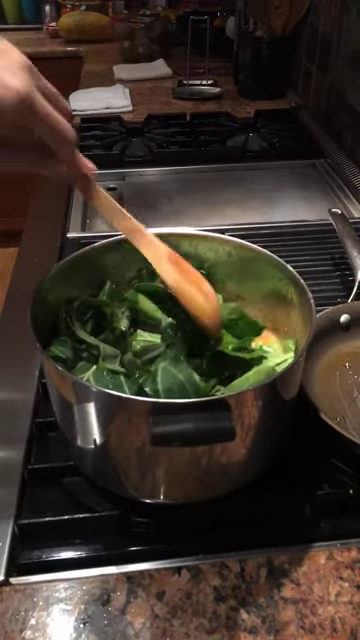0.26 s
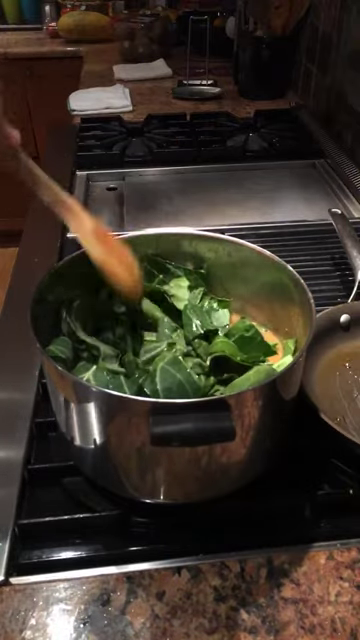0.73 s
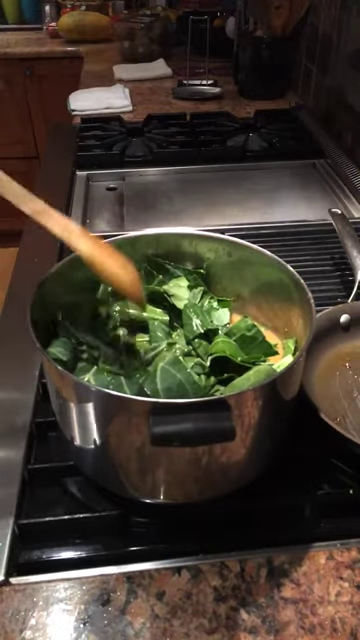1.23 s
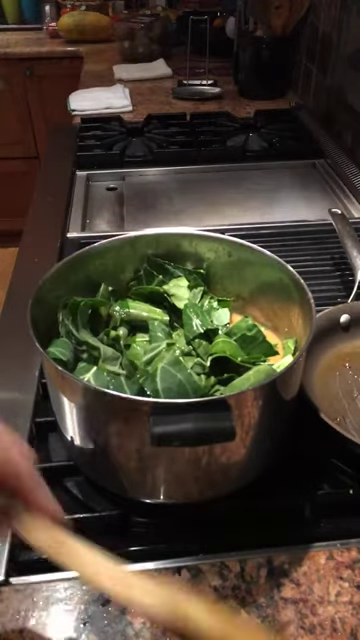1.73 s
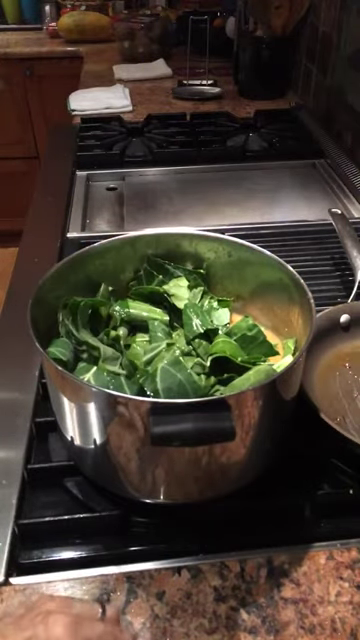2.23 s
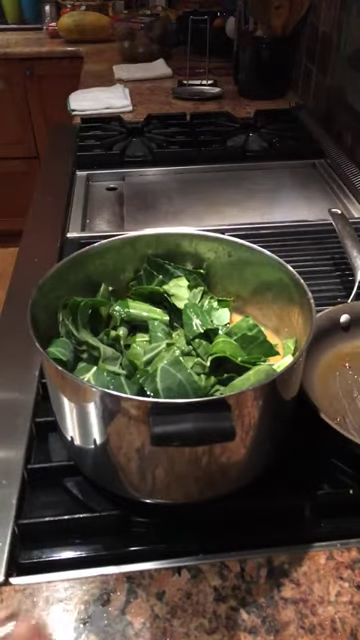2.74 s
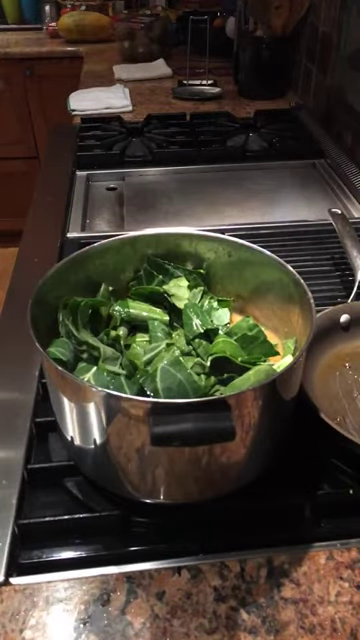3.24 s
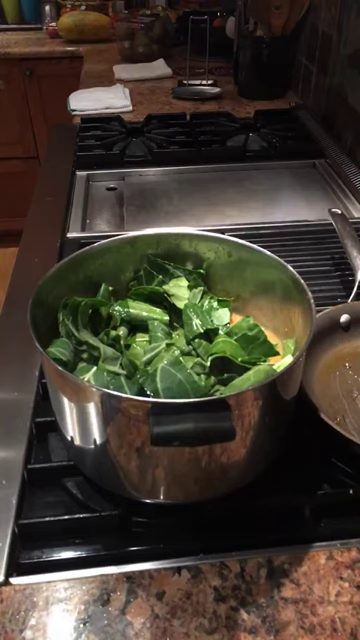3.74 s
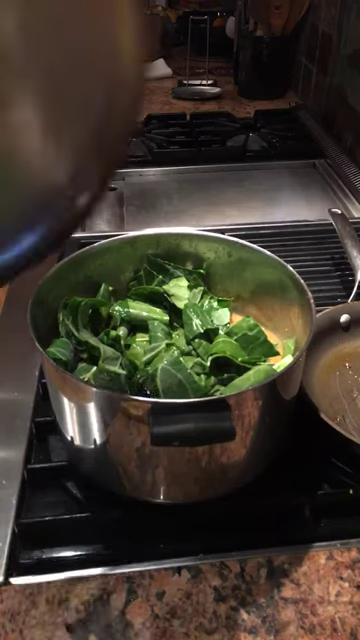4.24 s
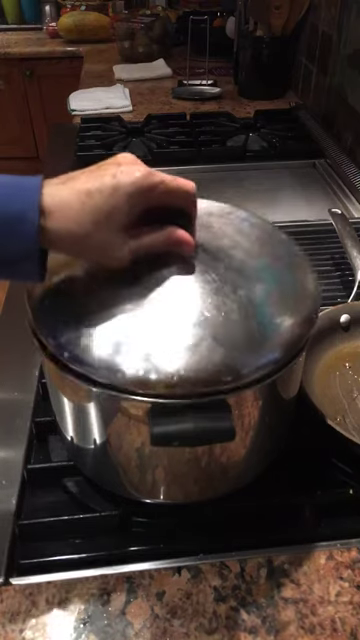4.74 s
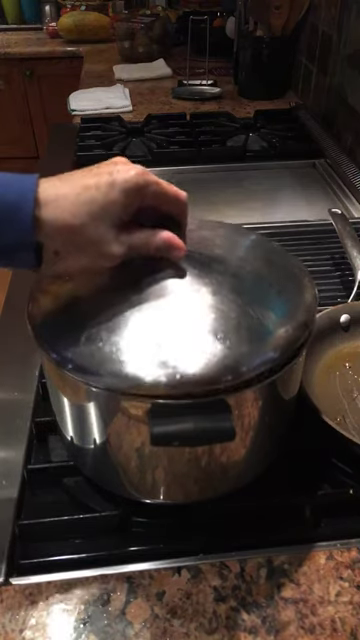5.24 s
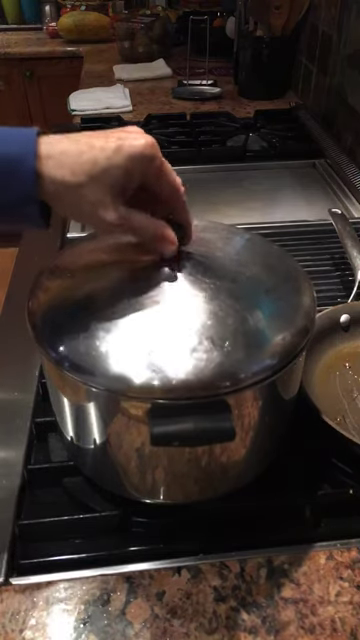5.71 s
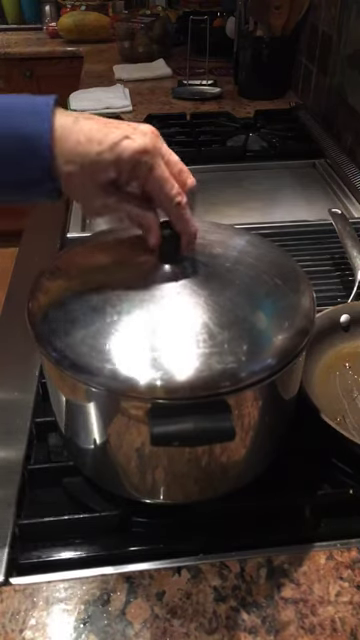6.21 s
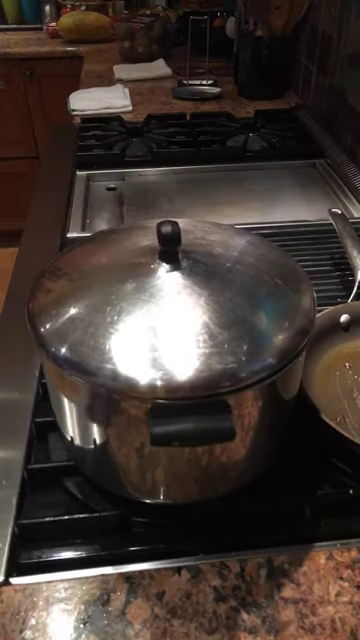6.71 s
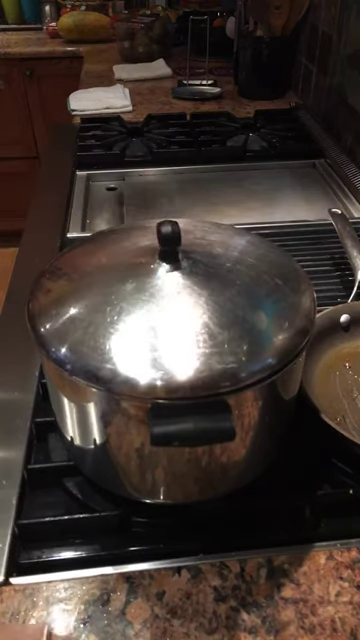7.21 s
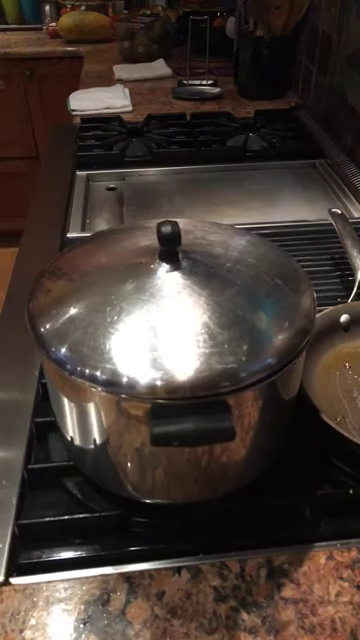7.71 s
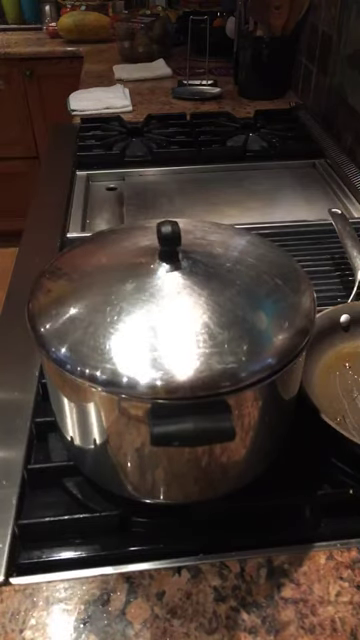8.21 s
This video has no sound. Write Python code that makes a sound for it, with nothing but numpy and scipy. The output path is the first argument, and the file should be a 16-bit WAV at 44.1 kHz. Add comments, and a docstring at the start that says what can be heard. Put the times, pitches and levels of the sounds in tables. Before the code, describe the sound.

Leafy greens crackle softly as a wooden spoon bumps a steel pot with two muffled knocks. The spoon then lands on a nearby spoon rest, which chatters sharply on the stone counter, the loudest sound. A little farther off, a metal lid clanks several times onto the pot and scrapes briefly along the rim. A low fan hum fills the small kitchen throughout, with faint swishes and clinks.

```python
"""A fan hums in a small kitchen. A wooden spoon pushes rustling greens down in a steel pot, knocking
its wall, then is dropped on a hard spoon rest, which chatters on the counter. A steel lid is picked up,
clatters onto the pot and is slid into place with a rasp. Faint swishes, clinks and one thin squeak
fall in between. Blows are decaying modes plus a noise burst; the microphone's limiter ducks under
the loudest clatter."""
import sys
import numpy as np
from scipy import signal
from scipy.fft import rfft, irfft, next_fast_len
from scipy.io import wavfile
from scipy.ndimage import uniform_filter1d, minimum_filter1d

SR = 44100
rng = np.random.default_rng(int(sys.argv[2]) if len(sys.argv) > 2 else 0)


def store_wav(level_fs):
    """Save 16-bit WAV to argv[1]."""
    pcm = np.round(np.clip(np.atleast_2d(level_fs), -1, 1) * 32767)
    wavfile.write(sys.argv[1], SR, pcm.T.astype(np.int16))


N = 373084
T = np.arange(N) / SR
RING_T = T[:SR // 2]


def undb(db):
    """Decibels to gain."""
    return 10 ** (np.asarray(db) / 20)


def unit(x):
    """Scale to rms 1."""
    return x / np.sqrt(np.mean(x ** 2))


def attack_unit(x):
    """Scale a blow to rms 1 over its first 10 ms."""
    return x / np.sqrt(np.mean(x[:SR // 100] ** 2))


def colour(x, points):
    """Filter x through a curve of (Hz, dB) points, rolled off below the first; rms 1."""
    hz, db = np.transpose(points)
    size = next_fast_len(len(x))
    bin_hz = np.arange(size // 2 + 1) * SR / size + 1
    gain = undb(np.interp(np.log(bin_hz), np.log(hz), db))
    low_cut = np.minimum(bin_hz / hz[0], 1) ** 2
    return unit(irfft(rfft(x, size) * gain * low_cut, size)[:len(x)])


def walk(rate_hz):
    """Smooth random wander; rms 1."""
    knots = rng.standard_normal(int(N / SR * rate_hz) + 2)
    return unit(np.interp(T * rate_hz, np.arange(len(knots)), knots))


def soften(x, cutoff_hz):
    """Low-pass: a longer contact feeds less treble into the body."""
    return signal.lfilter(*signal.butter(2, min(cutoff_hz, .45 * SR), fs=SR), x)


def add(out, start_s, x):
    """Mix x into out at start_s."""
    i = int(start_s * SR)
    out[i:i + len(x)] += x[:N - i]


def fade(t60_s):
    """Exponential decay, 60 dB in t60_s."""
    return np.exp(-np.log(1000) * RING_T / t60_s)


def swell(length_s, rise_share):
    """Rounded rise and fall, peaking at rise_share of its length."""
    progress = np.linspace(0, 1, int(length_s * SR))
    return np.sin(np.pi / 2 * np.interp(progress, [0, rise_share, 1], [0, 1, 0]))


def ring(modes, scatter_db):
    """Modes of a struck body; each contact point weights them differently."""
    draws = rng.standard_normal((len(modes), 2))
    out = np.zeros(len(RING_T))
    for (hz, db, t60_s), (weight, side) in zip(modes, draws):
        gain = np.sign(side) * undb(db + scatter_db * weight)
        out += gain * fade(t60_s) * np.sin(2 * np.pi * hz * RING_T)
    return attack_unit(out)


def crack(points, t60_s):
    """Crowded resonances dying together as a noise burst."""
    rise = np.minimum(RING_T / .00054, 1)
    return attack_unit(colour(rng.standard_normal(len(RING_T)), points) * rise * fade(t60_s))


def thud(hz, cycles):
    """A heavy body rocks: a few low cycles with a rounded start."""
    rise = 1 - np.exp(-2 * hz * RING_T)
    return attack_unit(np.sin(2 * np.pi * hz * RING_T) * fade(cycles / hz) * rise)


# Fan and mains tones. Each row: frequency in Hz, rms level in dB, signed waver in dB.
HUM_TONES = [(59.7, -47, 0.5), (69.2, -51.5, 3.5), (150.9, -42, -1.6), (297.7, -59, 2.5)]
# Rumble and room air spectra. Each row: frequency in Hz, relative level in dB.
RUMBLE_SPECTRUM = [(15, -2), (33, 11), (45, 6), (64, 7.5), (85, 5.5), (150, 3.5), (180, -8), (280, -2.5),
                   (330, -1), (400, -19.5), (520, -38.5)]
AIR_SPECTRUM = [(400, -1), (540, -3.5), (760, -6), (1460, -13), (2500, -17.5), (3500, -18.5), (5100, -26),
                (6200, -22.5), (8000, -26.5), (10400, -33), (13000, -32.5), (15800, -40)]


def fan():
    """Fan and mains tones waver in level and phase over low rumble and room air."""
    hum = np.zeros(N)
    for hz, db, waver_db in HUM_TONES:
        amplitude = np.sqrt(2) * undb(db + waver_db * walk(7))
        drift_rad = .25 * waver_db * walk(4.9)
        hum += amplitude * np.sin(2 * np.pi * hz * T + drift_rad)
    rumble = undb(-45.5) * colour(rng.standard_normal(N), RUMBLE_SPECTRUM)
    air = undb(-54 + .5 * walk(1.7)) * colour(rng.standard_normal(N), AIR_SPECTRUM)
    return hum + rumble + air


# Spoon strokes through the greens. Each row: start in seconds, length in seconds, level in dB.
LEAF_STROKES = [(0.322, 0.18, -52.5), (0.842, 0.065, -48.5), (.905, 0.069, -57.5), (1.128, 0.044, -52.5)]


def leaves():
    """Wet leaves crackle as the spoon pushes through."""
    envelope = sum(undb(db) * np.sin(np.pi * np.clip((T - start_s) / length_s, 0, 1))
                   for start_s, length_s, db in LEAF_STROKES)
    grains = rng.standard_normal(N) * undb(3.5 * np.minimum(rng.exponential(size=N), 6))
    return envelope * colour(grains, [(400, 2), (1500, 2), (4000, -1), (8000, -9), (15000, -7.5)])


# Swishes. Each row: start in seconds, length in seconds, level in dB, tilt in dB per octave.
SWISHES = [(0.477, 0.53, -57, -1), (1.515, 0.73, -56, -1), (3.406, 0.74, -55, 1), (4.021, 0.36, -56.5, 0.5),
           (4.5, 0.64, -57.5, 2), (6.727, 0.51, -52, -1), (7.544, .4, -56.5, -1.5), (8.165, .3, -56, 3)]
# Their hiss before tilt. Each row: frequency in Hz, relative level in dB.
HISS_SPECTRUM = [(500, 0), (1200, 2), (3500, -2), (5100, -7), (6500, -9), (10000, -11.5), (13000, -9),
                 (15500, -11)]


def swishes():
    """Faint airy hiss that comes quickly and ebbs slowly."""
    out = np.zeros(N)
    noise = rng.standard_normal(N) * undb(2.1 * walk(30))
    for start_s, length_s, db, tilt_db_per_octave in SWISHES:
        i = int(start_s * SR)
        envelope = swell(length_s, rise_share=.29)[:N - i]
        tilted = [(hz, band_db + tilt_db_per_octave * np.log2(hz)) for hz, band_db in HISS_SPECTRUM]
        hiss = colour(noise[i:i + len(envelope)], tilted)
        add(out, start_s, undb(db) * envelope * hiss)
    return out


# Spoon on the pot. Each row: start in seconds, level in dB, contact cutoff in Hz, thud level in dB.
POT_KNOCKS = [(.785, -27, 1050, -29.5), (.941, -45.5, 900, -59), (1.1715, -31, 1580, -36)]
# Filled pot's modes. Each row: frequency in Hz, relative level in dB, t60 in seconds.
POT_MODES = [(259, -7, 0.05), (404, -0.5, 0.044), (608, 0, 0.038), (908, -6.5, 0.036), (1220, -18, 0.046),
             (1580, -17, 0.047), (2800, -11, 0.028)]
# Its crowded resonances. Each row: frequency in Hz, relative level in dB.
POT_SPECTRUM = [(120, -15), (280, -4), (450, 0), (800, 2), (1500, -6.5), (3000, -14), (6000, -9),
                (15000, 1)]


def pot():
    """Wood on steel, muffled by greens: a graze, the blow, then the pot rocks back."""
    def knock(contact_hz):
        body = undb(-8.5) * ring(POT_MODES, scatter_db=-7) + crack(POT_SPECTRUM, t60_s=.055)
        return attack_unit(soften(body, contact_hz))

    out = np.zeros(N)
    for start_s, db, contact_hz, thud_db in POT_KNOCKS:
        graze = undb(db - 5) * knock(contact_hz=3250)
        blow = undb(db) * knock(contact_hz) + undb(thud_db) * thud(hz=298, cycles=12)
        rock = undb(db - 15.5) * knock(contact_hz) + undb(db - 7) * thud(hz=83, cycles=11)
        add(out, start_s - .003, graze)
        add(out, start_s, blow)
        add(out, start_s + .026, rock)
    return out


def squeak():
    """A thin, unsteady tone sinks as the spoon is lifted away."""
    start_s, start_hz, sag_hz_per_s = 1.56, 4600, 2000
    out = np.zeros(N)
    envelope = swell(length_s=.28, rise_share=.7)
    hz = (start_hz - sag_hz_per_s * T + 170 * walk(900))[:len(envelope)]
    tone = unit(np.sin(2 * np.pi * np.cumsum(hz) / SR))
    add(out, start_s, undb(-61.5) * envelope * tone)
    return out


# Spoon rest's modes. Each row: frequency in Hz, relative level in dB, t60 in seconds.
REST_MODES = [(706, -15, .06), (1250, -1, .07), (1298, -1, .07), (1355, -2, .07), (1518, -1, .05),
              (1578, -2, .05), (1684, -5, .05), (2487, 3, .1), (2525, -2, .11), (2745, -4, .06),
              (3050, -4, .06), (3368, -7, .09), (4005, 0, .07), (4530, -2, .06), (4620, -2, .05),
              (6050, -11, .06), (6870, -14, .07)]
# Its crowded resonances. Each row: frequency in Hz, relative level in dB.
REST_SPECTRUM = [(180, -28.5), (480, -15.5), (700, -4), (1000, -10.5), (1400, -3), (1700, -4.5),
                 (2200, -5.5), (2700, -1), (3400, -5.5), (4500, 4), (5150, -21.5), (6100, -4.5),
                 (7600, -18.5), (9500, -7.5), (15000, -21)]


def clack(db, contact_hz):
    """One blow on the spoon rest: hard blows ring, light ones only clack."""
    ringing = undb(3.5 + .27 * db) * ring(REST_MODES, scatter_db=1)
    body = ringing + crack(REST_SPECTRUM, t60_s=.067)
    return undb(db) * attack_unit(soften(body, contact_hz))


# The rest's high modes. Each row: frequency in Hz, relative level in dB, t60 in seconds.
CHATTER_MODES = [(6863, -13, .07), (6930, -14, .07), (7986, -15, .07), (8587, -14, .09), (9866, -14, .09),
                 (11072, -8, .06), (11200, -3, .08), (11883, 0, .08), (11960, -2, .08), (12012, -8, .06),
                 (13225, -8, .06), (13312, -1, .08), (13420, -6, .06), (13470, -5, .06), (13542, 1, .08),
                 (13658, -8, .06), (14497, -11, .07), (15646, -2, .08)]
# Its crowded high resonances. Each row: frequency in Hz, relative level in dB.
CHATTER_SPECTRUM = [(1000, -16), (4400, -24.5), (5100, -23), (6900, -14), (7600, -17), (9400, -11),
                    (10400, -22), (11100, -10), (12400, -8.5), (13400, -3), (14200, -7.5), (15600, -7)]


def chatter(db):
    """One bounce of the rest on the stone counter rings very high."""
    ringing = undb(4 + .4 * db) * ring(CHATTER_MODES, scatter_db=1)
    return undb(db) * attack_unit(ringing + crack(CHATTER_SPECTRUM, t60_s=.055))


# Spoon on its rest. Each row: start in seconds, level in dB, contact cutoff in Hz.
SPOON_HITS = [(2.0911, -7, 1830), (2.094, -5, 5400), (2.11, -10.5, 6460), (2.146, -11, 2200),
              (2.4152, -21, 8750), (2.4207, -28, 800), (2.51, -37.5, 1170)]
# Rattles of the rest. Each row: start in seconds, length in seconds, clack in dB, chatter in dB.
REST_RATTLES = [(2.104, 0.042, -24, -18.5), (2.1469, .074, -18.5, 2), (2.4236, 0.014, -30.5, -20)]


def spoon_drop():
    """The spoon strikes its rest, which rattles on the counter in quickening, fading bounces."""
    out = np.zeros(N)
    for start_s, db, contact_hz in SPOON_HITS:
        add(out, start_s, clack(db, contact_hz))
    gaps_s = .0125 * .9 ** np.arange(12)
    bounces_s = np.cumsum(gaps_s) - gaps_s
    for start_s, length_s, clack_db, chatter_db in REST_RATTLES:
        for after_s in bounces_s[bounces_s < length_s]:
            spent = after_s / length_s
            bounce = clack(clack_db - 8.5 * spent, contact_hz=8000) + chatter(chatter_db - 13.5 * spent)
            add(out, start_s + after_s, bounce)
    # The spoon and its rest carry almost no bass.
    return signal.lfilter(*signal.butter(2, 300, "high", fs=SR), out)


# Lid contacts. Each row: start in seconds, level in dB, contact cutoff in Hz, relative ring in dB,
# thud in Hz, thud level in dB, second touch's delay in seconds, its level against the first in dB.
LID_HITS = [(2.7002, -37.5, 5100, -18, 315, -30.5, .0066, -0.5),
            (4.718, -29.5, 10500, -1, 293, -40.5, .0035, -7),
            (4.819, -35.5, 3580, -2.5, 295, -34.5, 0.0046, 5.5),
            (4.951, -36, 5460, -6, 267, -27.5, 0.0024, 8.5),
            (4.976, -33.5, 4200, -16, 229, -26.5, .0147, 3.5),
            (5.082, -27, 11900, -11, 156, -23.5, .004, -15),
            (5.2437, -39, 3020, -17.5, 277, -25, 0.014, -0.5),
            (5.736, -45.5, 12200, -9, 185, -38, 0.0072, -12.5)]
# Steel lid's modes. Each row: frequency in Hz, relative level in dB, t60 in seconds.
LID_MODES = [(452, -7, .15), (790, -12, .15), (858, -5, .22), (905, -9, .15), (1277, -8, .2),
             (1330, -7, .2), (1797, -6, .22), (1828, -2, .7), (1906, 0, .45), (1991, -4, .3),
             (2130, -8, .25), (2378, -12, .25), (2778, -13, .25), (3150, -9, .22), (3340, -11, .25),
             (4124, -9, .18), (4280, -9, .16), (4547, -14, .28), (6288, -18, .2), (8850, -19, .15)]
# Its crowded resonances. Each row: frequency in Hz, relative level in dB.
LID_SPECTRUM = [(150, 5), (400, 0), (900, -2.5), (1550, -8.5), (1950, -2.5), (2800, -11.5), (3250, -10),
                (3600, -13), (4250, -4.5), (5100, -14.5), (6500, -10.5), (7600, -14.5), (10000, -7.5),
                (15000, -4.5)]
# Stove top booming as the lid settles. Each row: start in seconds, level in dB.
STOVE_BOOMS = [(4.9907, -31), (5.085, -34)]


def lid_clatter():
    """The held lid touches twice per hit and rings briefly; its weight thumps pot and stove."""
    out = np.zeros(N)
    shell = crack(LID_SPECTRUM, t60_s=.14)  # the same thin steel answers every touch
    for start_s, db, contact_hz, ring_db, thud_hz, thud_db, second_s, second_db in LID_HITS:
        for after_s, touch_db in (0, 0), (second_s, second_db):
            hand_damped = ring(LID_MODES, scatter_db=1.5) * fade(t60_s=.6)
            click = crack(LID_SPECTRUM, t60_s=.04)
            body = undb(ring_db) * hand_damped + undb(-2.5) * shell + undb(-2) * click
            add(out, start_s + after_s, undb(db + touch_db) * attack_unit(soften(body, contact_hz)))
        add(out, start_s, undb(thud_db) * thud(thud_hz, cycles=15))
    for start_s, db in STOVE_BOOMS:
        add(out, start_s, undb(db) * thud(hz=61.4, cycles=11.8))
    return out


# Ticks around the stove. Each row: start in seconds, level in dB, centre in Hz, burst t60 in seconds,
# relative ring in dB.
TICKS = [(3.389, -33.5, 2190, 0.055, -10), (3.391, -39.5, 497, .06, -30), (3.394, -36, 2800, 0.11, -5),
         (3.8912, -50, 4470, 0.14, -11), (4.574, -56, 3960, 0.035, -13.5),
         (6.744, -43.5, 2590, 0.17, -16.5), (7.116, -50, 1105, 0.023, -24), (7.17, -44, 3540, 0.03, -23.5),
         (7.177, -39.5, 910, 0.028, -37), (7.3133, -54.5, 7800, .03, -24),
         (7.8941, -50.5, 2090, 0.092, -16), (8.0115, -53, 3740, .08, -5)]
# Clink modes. Each row: frequency in Hz, relative level in dB, t60 in seconds.
CLINK_MODES = [(1233, -7, .25), (1491, -2, .17), (2218, -6, .2), (2519, -6, .14), (2815, -4, .12),
               (2907, -4, .11), (3165, 0, .09), (4560, -9, .13)]


def ticks():
    """Short noise bursts, each around its own pitch; some ring like thin steel."""
    out = np.zeros(N)
    for start_s, db, hz, t60_s, ring_db in TICKS:
        hump = [(hz / 5, -11), (hz / 1.3, -4), (hz * 1.13, 0), (hz * 1.9, -13), (hz * 8, -22)]
        burst = crack(hump, t60_s)
        clink = undb(ring_db) * ring(CLINK_MODES, scatter_db=4.5)
        add(out, start_s, undb(db) * (burst + clink))
    return out


# Rasp of the lid on the rim. Each row: frequency in Hz, relative level in dB.
RASP_SPECTRUM = [(150, 9.5), (290, 12), (420, 0.5), (700, -1.5), (1500, -2), (2080, 8.5), (2750, 1),
                 (3200, 2), (3600, -3), (4300, 4.5), (5100, -2.5), (6300, -2.5), (10000, -4), (13500, -2.5),
                 (15800, -7)]


def lid_slide():
    """One push of steel on steel: dense tiny slips hiss at the rim and ring the lid."""
    full_s, hold_s, rise_db_per_s, fall_db_per_s = 5.875, .12, 174.5, 135.5
    slips = rng.standard_normal(N) * undb(2.8 * np.minimum(rng.exponential(size=N), 6) + 2.2 * walk(120))
    rasp = colour(slips, RASP_SPECTRUM)
    pressed_lid = ring(LID_MODES, scatter_db=1) * fade(t60_s=.15)
    ringing = unit(signal.fftconvolve(slips, pressed_lid)[:N])
    before_s = np.maximum(full_s - T, 0)
    after_s = np.maximum(T - full_s - hold_s, 0)
    push_db = -35.5 - rise_db_per_s * before_s - fall_db_per_s * after_s
    return (rasp + undb(-6.5) * ringing) * undb(push_db)


def kitchen(x, wet_db, low_t60_s, high_t60_s):
    """Diffuse reflections of a small room; treble dies sooner."""
    noise = rng.standard_normal(len(RING_T))
    low = soften(noise, cutoff_hz=4500)
    onset = np.clip((RING_T - .004) / .0061, 0, 1)
    tail = onset * (low * fade(low_t60_s) + undb(-5) * (noise - low) * fade(high_t60_s))
    tail /= np.sqrt(np.sum(tail ** 2))
    return x + undb(wet_db) * signal.fftconvolve(x, tail)[:N]


def scene():
    """Mono mix; the spoon rest is nearer the microphone than the stove, so drier."""
    near = kitchen(spoon_drop(), wet_db=-21, low_t60_s=.5, high_t60_s=.32)
    stove = pot() + lid_clatter() + lid_slide() + ticks() + leaves()
    far = kitchen(stove, wet_db=-13, low_t60_s=.5, high_t60_s=.4)
    return (near + far + swishes() + squeak() + fan())[None]


def limiter(x, ceiling_db, release_db_per_s):
    """Gain drops just ahead of any peak over the ceiling and recovers slowly."""
    over_db = np.maximum(20 * np.log10(np.abs(x) + 1e-9) - ceiling_db, 0)
    release_db = release_db_per_s * T
    cut_db = np.maximum.accumulate(over_db + release_db, axis=-1) - release_db
    held_gain = minimum_filter1d(undb(-cut_db), size=45)
    return x * uniform_filter1d(held_gain, size=45)


def record(dry):
    """Limiter, then a steep low-pass at 15750 Hz."""
    limited = limiter(dry, ceiling_db=.5, release_db_per_s=36)
    return signal.sosfilt(signal.ellip(10, .2, 70, 15750, fs=SR, output="sos"), limited)


dry = scene()
out = record(dry)
store_wav(out)
```